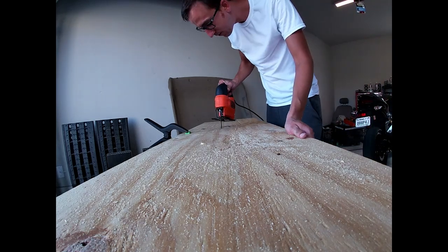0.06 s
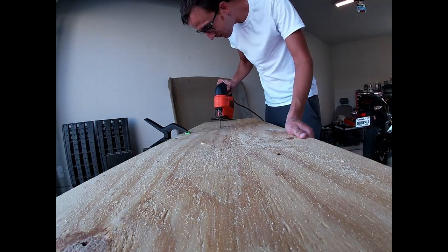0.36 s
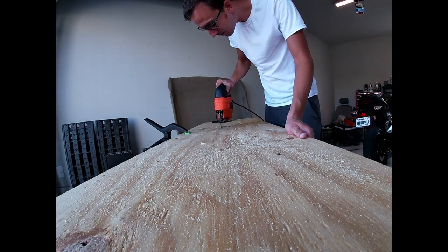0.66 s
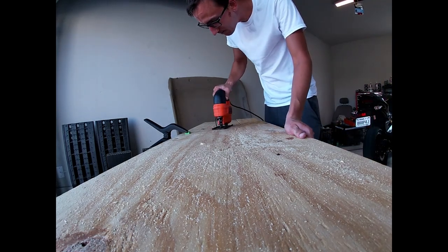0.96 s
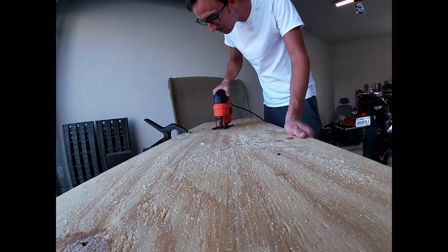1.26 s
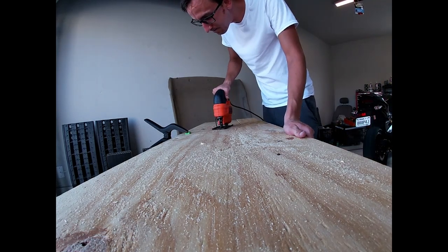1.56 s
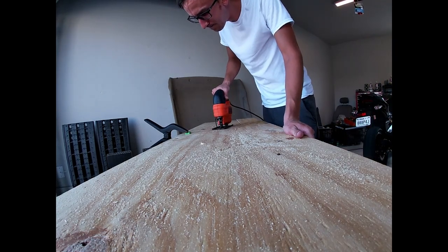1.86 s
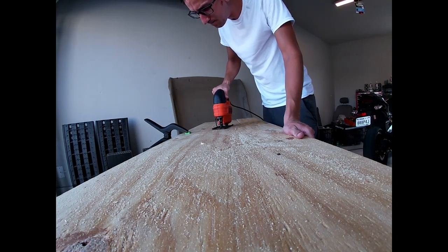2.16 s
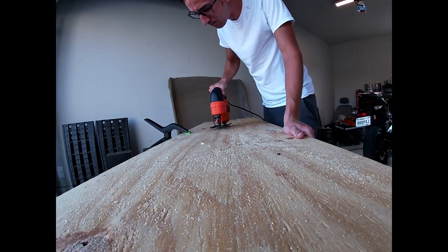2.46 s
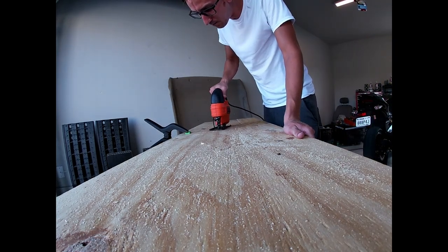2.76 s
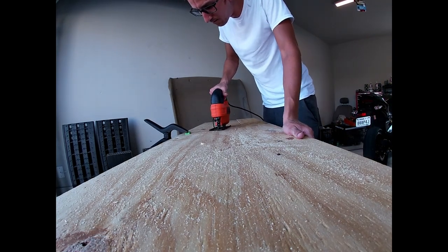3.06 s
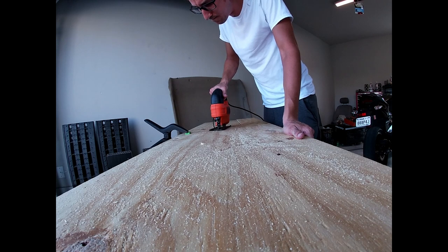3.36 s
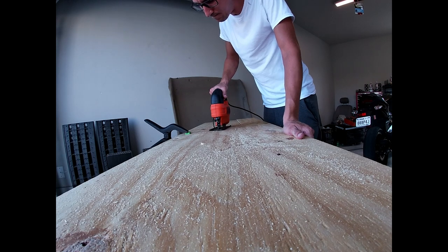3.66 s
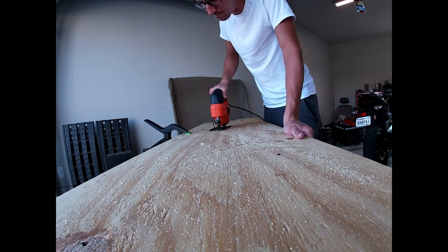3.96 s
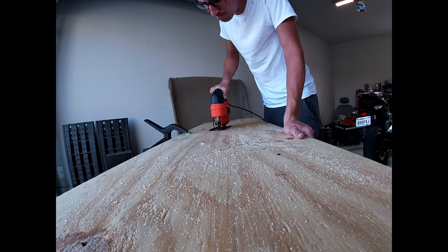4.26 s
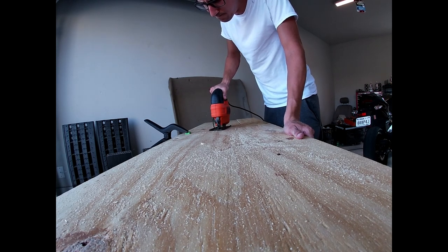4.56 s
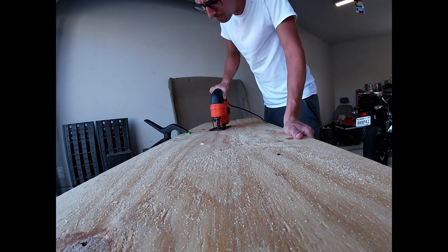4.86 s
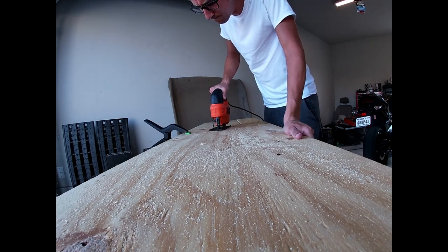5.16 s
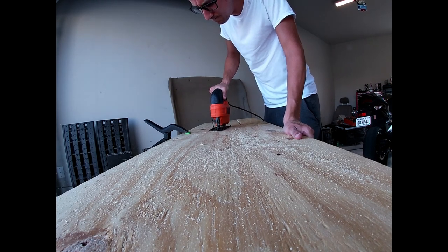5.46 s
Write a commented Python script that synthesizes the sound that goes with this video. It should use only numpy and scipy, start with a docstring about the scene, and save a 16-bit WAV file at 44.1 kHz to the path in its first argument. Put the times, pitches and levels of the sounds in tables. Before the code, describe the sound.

Over the rush and hum of a fan in a garage, a jigsaw is set on plywood and nudged into position, with two bouts of metal scrapes, knocks and low wooden creaks. Near the end it clicks on and kicks several times, then settles into buzzing, whining sawing that makes the whole sheet drone. The room adds a short echo.

```python
"""A corded jigsaw cuts a plywood sheet: the motor starts, the blade kicks a few times, then settles
at about 46 strokes a second. One crank shakes the sheet, drives the rasping blade and sets the
pitch of the gear whine. Before the cut, the steel shoe scrapes, judders and knocks on the board,
and the switch clicks on. Behind it are a humming fan and faint thin whistles in a bare garage.
A gain control ducks everything after each loud moment."""
import sys
import numpy as np
from scipy import signal
from scipy.fft import rfft, irfft
from scipy.io import wavfile
from scipy.ndimage import uniform_filter1d

SR = 44100
rng = np.random.default_rng(int(sys.argv[2]) if len(sys.argv) > 2 else 0)


def transcribe(u):
    """Save the signal u as a 16-bit wav file named by the first command-line argument.

    u: samples, shape (n,) or (channels, n), limited to [-1, 1]; the rate is SR.
    q: integer samples, one column per channel.
    """
    v = np.clip(np.atleast_2d(u).T, -1, 1)
    q = np.round(v * 32767).astype(np.int16)
    wavfile.write(sys.argv[1], SR, q)


N = 242550
T = np.arange(N) / SR
FFT_SIZE = 2 ** 18
HZ = np.fft.rfftfreq(FFT_SIZE, 1 / SR)
MOTOR_ON_S = 4.053


def amp(db):
    """Decibels to gain."""
    return 10 ** (np.asarray(db) / 20)


def unit(x):
    """Scales to rms 1."""
    return x / np.sqrt(np.mean(x ** 2) + 1e-20)


def curve(rows, column=1):
    """One column of a time table as an automation curve."""
    rows = np.array(rows, float)
    return np.interp(T, rows[:, 0], rows[:, column])


def swell(peak_s, rise_s, fall_s, roundness=1.35):
    """An envelope that rises to 1 and falls away."""
    return np.exp(-(abs(T - peak_s) / np.where(T < peak_s, rise_s, fall_s)) ** roundness)


def response(points, modes=(), hz=HZ):
    """A broad EQ curve with resonant peaks on top, in dB."""
    point_hz, db = np.transpose(points)
    broad = np.interp(np.log(hz + 1), np.log(point_hz + 1), db)
    return broad + sum(boost / (1 + (2 * (hz - centre) / width) ** 2) for centre, width, boost in modes)


def colour(x, db):
    """Minimum-phase EQ: resonances ring after what strikes them."""
    cepstrum = irfft(np.log(amp(np.maximum(db, -110))))
    cepstrum[1:FFT_SIZE // 2] *= 2
    cepstrum[FFT_SIZE // 2 + 1:] = 0
    return irfft(rfft(x, FFT_SIZE) * np.exp(rfft(cepstrum)))[:len(x)]


def noise():
    """White noise."""
    return rng.standard_normal(N)


def wander(rate_hz):
    """Smooth random modulation of rms 1."""
    return unit(irfft(rfft(noise(), FFT_SIZE) * np.exp(-(HZ / rate_hz) ** 2))[:N])


def add(mix, start_s, sound):
    """Lays a sound into the mix."""
    part = mix[round(start_s * SR):][:len(sound)]
    part += sound[:len(part)]


def garage(x, wet_db, t60_s=0.53):
    """Adds the bare room: sparse reflections whose treble dies first."""
    t = np.arange(SR // 2) / SR
    taps = rng.choice([-1., 1.], len(t)) * (rng.random(len(t)) < .08) * (t > .004)
    hz, age, spectrum = signal.stft(taps, SR, nperseg=256)
    decay = amp(-60 * age * (1 + hz[:, None] / 14000) / t60_s)
    tail = signal.istft(spectrum * decay, SR, nperseg=256)[1]
    return x + amp(wet_db) * signal.fftconvolve(x, tail / np.linalg.norm(tail))[:N]


# Rush of the fan: freq_hz, gain_db
AIR_EQ = [(40, -18.5), (90, -14), (160, -2.5), (240, -2.5), (350, -3.5), (500, -5), (750, -10.5),
          (1100, -16), (2000, -20.5), (3000, -21), (3900, -28.5), (5500, -34.5), (6300, -47), (8000, -58),
          (13000, -72.5)]
# Steadier tones of the hum: harmonic, level_db
HUM_TONES = [(1, -46), (3, -36), (4, -43), (5, -46)]
# Fader ride on those tones: time_s, gain_db
HUM_RIDE = [(0, -5.5), (1.4, 5.5), (2.35, -6), (2.6, -5), (3.05, -13), (3.9, 0.5)]
# Throbbing second harmonic: time_s, level_db
THROB_RIDE = [(0, -40), (.1, -31), (.33, -33.5), (.49, -23.5), (.56, -33), (.8, -29.5), (1.17, -36),
              (1.29, -22.5), (1.43, -39.5), (1.55, -29.5), (1.93, -40), (2.08, -26), (2.28, -37),
              (2.37, -27), (2.54, -49), (2.63, -31), (3.05, -45), (3.4, -47), (3.48, -32), (3.6, -39.5),
              (3.98, -27.5), (4.3, -39)]


def fan(pitch_hz=86.13, air_db=-31):
    """Rushing air and a wavering blade hum whose strongest tone swells and sinks."""
    air = unit(colour(noise(), response(AIR_EQ))) * amp(air_db + .5 * wander(9.0))
    turns = np.cumsum(pitch_hz * (1 + 0.0029 * wander(3.4))) / SR
    hum = sum(amp(db + 2.5 * wander(3.6)) * np.sin(2 * np.pi * (round(k) * turns + rng.random()))
              for k, db in HUM_TONES)
    throb_gain = amp(curve(THROB_RIDE) + 1.7 * wander(12))
    throb = throb_gain * np.sin(4 * np.pi * turns + 0.67 * wander(12))
    return air + np.sqrt(2) * (hum * amp(curve(HUM_RIDE)) + throb)


# Faint whistles: start_s, length_s, pitch_hz, level_db
WHISTLE_CUES = [(0.2, 0.06, 5600, -58), (0.4, 0.13, 5700, -57.5), (1.064, 0.12, 5620, -60),
                (1.58, .14, 5550, -65.5), (1.93, 0.26, 5700, -64), (2.857, 0.11, 7050, -72),
                (3.26, 0.36, 6370, -74)]


def whistles():
    """Thin high tones that swell and fade."""
    out = np.zeros(N)
    for start_s, length_s, hz, db in WHISTLE_CUES:
        n = int(length_s * SR)
        turns = np.cumsum(hz + 35 * wander(90)[:n]) / SR
        tone = np.sqrt(2) * np.sin(2 * np.pi * turns)
        add(out, start_s, amp(db) * tone * signal.windows.tukey(n, .6))
    return garage(out, wet_db=-0.5)


# Partials of the shoe: pitch_hz, level_db, t60_s
SHOE_MODES = [(2914, -7, 0.17), (3130, -12.5, 0.08), (2700, -15, 0.065), (4760, -16, 0.2)]


def shoe_ring(t):
    """The steel shoe rings after a tap."""
    attack = (1 - np.exp(-t / 0.0011)) ** 2
    return attack * sum(amp(db - 60 * t / t60) * np.sin(2 * np.pi * hz * t) for hz, db, t60 in SHOE_MODES)


# Scrape of steel on wood: freq_hz, gain_db
SCRAPE_EQ = [(300, -26.5), (700, -4), (1300, 8.5), (1850, 4.5), (2400, 5), (3500, -2.5), (5300, -11.5),
             (6300, -32), (8000, -55), (13000, -68)]
# Fine grit: freq_hz, gain_db
GRIT_EQ = [(3000, -27), (6000, 7), (8000, 0.5), (10000, -3.5), (11000, -18.5), (14000, -23)]
# Slides of the shoe: peak_s, rise_s, fall_s, scrape_db, ring_vs_scrape_db
SLIDE_CUES = [(.785, 0.08, 0.1, -36.5, -16), (0.935, 0.071, 0.12, -26, -15),
              (2.42, 0.069, 0.063, -30.5, -17), (2.745, 0.049, 0.091, -29, -19)]
# Crumbs under the shoe: peak_s, level_db
CRUNCH_CUES = [(.88, -61), (2.425, -52), (2.761, -56)]


def sliding(grain, grit_vs_scrape_db=-39.5, ring_lag_s=0.061):
    """The shoe grates over the grain and crushes crumbs; its ring builds up behind the scrape."""
    slide_env = sum(amp(db) * swell(s, rise, fall) for s, rise, fall, db, _ in SLIDE_CUES)
    ring_env = sum(amp(db + ring_db) * swell(s + ring_lag_s, rise, fall)
                   for s, rise, fall, db, ring_db in SLIDE_CUES)
    crunch_env = sum(amp(db) * swell(s, 0.0043, 0.028, roundness=1.1) for s, db in CRUNCH_CUES)
    scrape = unit(colour(grain, response(SCRAPE_EQ)))
    grit = unit(colour(grain, response(GRIT_EQ)))
    ring = unit(signal.fftconvolve(grain, shoe_ring(T[:SR // 2]))[:N])
    return slide_env * (scrape + amp(grit_vs_scrape_db) * grit) + ring_env * ring + crunch_env * grit


# Body of the plywood, also under the knocks and the cut: freq_hz, gain_db
SHEET_EQ = [(30, -27.5), (110, -34.5), (150, -4.5), (300, -10), (480, -5), (650, -7.5), (900, -12.5),
            (1200, -32), (2500, -44), (8000, -88.5)]
# Groan of the sheet: pitch_hz, width_hz, relative_db
GROAN_MODES = [(169.6, 12.8, 6), (233.7, 44, 5.5)]
# Rumble of the table: freq_hz, gain_db
RUMBLE_EQ = [(12, -9.5), (35, 5.5), (60, 5), (100, -1), (140, 2), (220, -25), (600, -73)]
# Swells from leaning on the tool, the switch-on thump, then the running saw shaking the table:
# peak_s, fade_s, groan_db, rub_db, rock_db
SWELL_CUES = [(0.19, 0.13, -29.5, -35, -25.5), (.46, 0.063, -27.5, -48, -55),
              (0.968, 0.11, -18.5, -20, -18), (1.75, 0.092, -35, -36, -31), (2.1, 0.07, -40, -26.5, -39),
              (2.215, 0.013, -41, -54, -28.5), (2.4, 0.044, -26.5, -31, -29.5),
              (2.79, 0.086, -24.5, -30, -21), (3.02, 0.027, -58, -45, -30.5), (3.19, 0.1, -51, -35.5, -42),
              (3.461, 0.063, -51, -37, -32.5), (4.05, 0.039, -22.5, -27.5, -30),
              (5.4, .25, -36, -38.5, -35)]


def groan_and_rumble(grain, resting_db=-41.5, rock_lag_s=0.031):
    """In each swell the sheet groans, the shoe rubs on it and the table rocks a little later."""
    groan = np.zeros(N)
    for hz, width_hz, db in GROAN_MODES:
        gain = amp(db + 2 * wander(width_hz))
        pitch = hz + width_hz * wander(26.2) / 2
        groan += gain * np.sin(2 * np.pi * np.cumsum(pitch) / SR)
    groan = unit(groan)
    rub = unit(colour(grain, response(SHEET_EQ, modes=[(225, 140, 3.8), (368, 95, 7.9)])))
    rumble = unit(colour(noise(), response(RUMBLE_EQ)))
    out = amp(resting_db) * (groan + rumble)  # the resting weight of the hand
    for peak_s, fade_s, groan_db, rub_db, rock_db in SWELL_CUES:
        out += swell(peak_s, fade_s, fade_s) * (amp(groan_db) * groan + amp(rub_db) * rub)
        out += swell(peak_s + rock_lag_s, fade_s, 1.2 * fade_s) * amp(rock_db) * rumble
    return out


# Squeaks and low creaks of the shoe: peak_s, fade_s, pitch_hz, level_db
JUDDER_CUES = [(0.782, 0.031, 2190, -37), (.957, 0.012, 2880, -27.5), (1.012, 0.024, 2870, -28.5),
               (2.102, 0.067, 302.5, -23), (2.441, .05, 194, -25)]


def judder(sag_per_s=.15, waver=0.012):
    """The shoe sticks and slips in short, unsteady, falling tones."""
    out = np.zeros(N)
    for peak_s, fade_s, hz, db in JUDDER_CUES:
        pitch = hz * (1 - sag_per_s * (T - peak_s) + waver * wander(50))
        tone = np.sqrt(2) * np.sin(2 * np.pi * np.cumsum(pitch) / SR)
        out += tone * amp(db) * swell(peak_s, fade_s, fade_s)
    return out


# Body of the blade, plunger and shoe: freq_hz, gain_db
STEEL_EQ = [(100, -11), (700, -4.5), (1200, -3), (1550, -1.5), (2150, 0.5), (2500, -7.5), (3200, -4.5),
            (3700, -8.5), (5200, -10), (6200, -25), (7500, -31.5), (9700, -42), (10800, -48), (13000, -52)]
# Resonances of the plywood: centre_hz, width_hz, boost_db
SHEET_PEAKS = [(170.4, 24, 6.6), (227.4, 18, 10.2), (301.6, 14.6, 13.1), (317.6, 13, 8.2),
               (370.5, 4.6, 20.7), (397.4, 15, 10), (414, 17, 8.7), (481.6, 22, 7.2), (501.7, 18, 12.2),
               (564, 18, 9.8), (608, 4.2, 5.5), (785, 8.9, 11.3)]
# Knocks of the shoe on the sheet, then the bright click of switching on:
# start_s, clack_db, thud_db, tilt_db_per_octave, clack_centre_hz
KNOCK_CUES = [(.169, -33.5, -30, 2, 2160), (.186, -45, -24.5, -11, 1200), (.9268, -10, -24, -10.5, 2910),
              (.9285, -11, -18, -10, 1640), (.952, -16, -15.5, -10, 1490), (.9737, -20, -26, -9, 1600),
              (2.323, -37, -40, 8, 3470), (2.389, -28, -29, 8, 1850), (2.4206, -24.5, -28, 8.5, 2270),
              (2.467, -36, -33, 9, 2000), (2.707, -32.5, -27, 8, 3300), (2.7243, -14, -33, -7.5, 1920),
              (2.7255, -25, -34, -1, 3020), (2.7595, -25.5, -25.5, 1, 2400), (2.7656, -20, -26, -8, 1500),
              (2.7704, -31, -31.5, -1, 2200), (4.044, -28, -35, 8, 3500)]


def knocks(cues, clack_s=0.0036, thud_s=0.0087, ring_db=-10, rise_s=0.00042, focus_db=12):
    """Each knock is a short chatter of steel and a softer thud in the sheet."""
    t, out = np.arange(2 ** 15) / SR, np.zeros(N)
    hz, click = np.fft.rfftfreq(len(t), 1 / SR), signal.unit_impulse(len(t))
    steel = rfft(colour(click, response(STEEL_EQ, modes=[(1810, 160, 5.7), (2780, 620, 15.2)])))
    wood = rfft(colour(click, response(SHEET_EQ, SHEET_PEAKS) - 11.4 * np.log2(HZ / 300 + 1)))
    contact = (1 - np.exp(-(t / rise_s) ** 2)) * (1 - t / t[-1])  # wood gives a little under the blow
    octaves = np.log2(np.minimum(hz, 7000) / 2000 + .5)
    for start_s, clack_db, thud_db, tilt, centre_hz in cues:
        chatter, push = rng.standard_normal((2, len(t)))
        focus = focus_db / (1 + ((hz - centre_hz) / 230) ** 2)
        clack = irfft(rfft(chatter * np.exp(-t / clack_s)) * steel * amp(tilt * octaves + focus))
        clack /= np.std(clack[:SR // 200])
        thud = irfft(rfft(push * np.exp(-t / thud_s)) * wood)
        thud /= np.std(thud[:SR // 50])
        # a clack near the shoe's own pitch sets it ringing most
        ring = amp(ring_db + np.interp(SHOE_MODES[0][0], hz, focus) - focus_db) * shoe_ring(t)
        add(out, start_s, contact * (amp(clack_db) * (clack + ring) + amp(thud_db) * thud))
    return garage(out, wet_db=-10.5)


# Lowest modes of the sheet: pitch_hz, level_db
HEAVE_TONES = [(41, -25), (76, -19), (168, -13)]
# The blade catches: start_s, clack_db, thud_db, tilt_db_per_octave, clack_centre_hz
KICK_CUES = [(4.0515, -16, -22, -9.5, 1870), (4.056, -18, -26.5, 3.5, 4400), (4.068, -14, -18, -12.5, 2900),
             (4.089, -13, -13, -7, 2010), (4.1052, -1.5, -21, -9, 1830), (4.1266, -5.5, -10.5, -10.5, 1950),
             (4.1539, -8, -8, -5, 1920), (4.1655, -7, -11, -4, 2060), (4.185, -4.5, -13, -11, 1690),
             (4.2, -12, -16, -19, 1680), (4.2191, -5.5, -8.5, -8, 1680), (4.2497, -7, -11.5, -10, 1680),
             (4.2887, -9, -12.5, 1, 1690), (4.3068, -21, -21, -7, 1640)]


def kicks():
    """The catching blade clacks, and the first strokes heave the whole sheet."""
    sway = sum(amp(db) * np.sin(2 * np.pi * (hz * T + rng.random())) for hz, db in HEAVE_TONES)
    heave = np.sqrt(2) * sway * swell(peak_s=4.086, rise_s=0.036, fall_s=0.0091)
    return heave + knocks(KICK_CUES, clack_s=0.0094, ring_db=-15.0, rise_s=0.00092, focus_db=8.5)


def harmonics(stroke_hz, turns, body, modes, last, flutter_db, first=1):
    """Harmonics of the stroke rate, each loud as it crosses a mode of the body; levelled to rms 1."""
    on, out, waver = T > MOTOR_ON_S, np.zeros(N), wander(25)
    t, coarse_hz = T[on], stroke_hz[on][::64]
    for k in range(first, last + 1):
        gain = np.interp(t, t[::64], amp(response(body, modes, k * coarse_hz)))
        flutter = amp(flutter_db * np.roll(waver, rng.integers(N))[on])
        out[on] += gain * flutter * np.cos(2 * np.pi * (k * turns[on] + rng.random()))
    return out / np.sqrt(abs(uniform_filter1d(out ** 2, size=4000)) + 1e-9)


# Body of the gear housing: freq_hz, gain_db
GEAR_EQ = [(1200, -28), (1520, -22.5), (1620, -12), (1720, -10.5), (1765, -31), (1860, -8.5), (1950, -17),
           (2150, -30)]
# Its peak and notch: centre_hz, width_hz, gain_db
GEAR_MODES = [(1680, 37, 9), (1950, 34, -10.5)]


def gear_whine(stroke_hz, turns):
    """The gears mesh cleanly: a few high harmonics sing steadily in the housing."""
    return harmonics(stroke_hz, turns, GEAR_EQ, GEAR_MODES, first=30, last=58, flutter_db=1.5)


# Flap, boom and growl bands of the sheet: centre_hz, half_width_hz
SHEET_BANDS = [(130, 100), (370, 30), (505, 50)]
# EQ ride on those bands: time_s, flap_db, boom_db, growl_db
FLEX_RIDE = [(4.05, 3, -5, -3), (4.15, -3, 5.5, -7.5), (4.27, -3, 5, 4), (4.33, -12, 5, -0.5),
             (4.43, -2, -0.5, 1.5), (4.52, -0.5, -1, -0.5), (4.7, 1, -3.5, 3.5), (4.88, 1.5, 0, -1.5),
             (5.02, 5, 4.5, 1.5), (5.18, 3, -2, 0), (5.28, -0.5, -5.5, 4), (5.4, -1, -7.5, 1),
             (5.5, 2, 0, -2)]


def flexing(x):
    """The sheet flexes differently as the shoe travels: three bands swell and sink."""
    spectrum, out = rfft(x, FFT_SIZE), x
    for column, (centre, width) in enumerate(SHEET_BANDS, start=1):
        band = irfft(spectrum * np.exp(-((HZ - centre) / width) ** 4))[:N]
        out = out + band * (amp(curve(FLEX_RIDE, column)) - 1)
    return out


def shaking(stroke_hz, turns, evenness, slip_turns=0.0044, sway_db=1.5):
    """The crank drives the sheet in step with the strokes; uneven strokes make it drum."""
    slipping = turns + slip_turns * wander(33)  # no stroke comes quite on time
    drone = harmonics(stroke_hz, slipping, SHEET_EQ, SHEET_PEAKS, last=28, flutter_db=1.0)
    drone *= amp(sway_db * wander(35))  # or is as strong as the last
    buffets = noise() * (1 + 0.76 * np.cos(4 * np.pi * turns))
    drumming = unit(colour(buffets, response(SHEET_EQ, SHEET_PEAKS)))
    return flexing(np.sqrt(evenness) * drone + np.sqrt(1 - evenness) * drumming)


# Resonances of the blade, plunger and shoe: centre_hz, width_hz, boost_db
STEEL_PEAKS = [(1560, 70, 1.6), (1655, 44, 9.3), (1900, 33, 5.1), (2400, 170, 2.4), (2840, 82, 5.8)]


def blade(stroke_hz, turns, evenness, play_turns=0.0029):
    """The plunger buzzes through the steel; the teeth tear the plies on both halves of the stroke."""
    loose = turns + play_turns * wander(63)  # play in the guide smears the highest harmonics
    buzz = harmonics(stroke_hz, loose, STEEL_EQ, STEEL_PEAKS, last=72, flutter_db=7.0)
    bite = .9 + np.exp(-(2 * turns % 1) / .25)
    fibres = noise() * bite * amp(0.9 * wander(360) + 1.1 * wander(30))
    bright_steel = response(STEEL_EQ, STEEL_PEAKS) + 2.0 * np.log2(HZ / 2000 + .5)
    rasp = unit(garage(colour(fibres, bright_steel), wet_db=-9.0))
    buzz_share = amp(-6) * evenness
    return np.sqrt(buzz_share) * buzz + np.sqrt(1 - buzz_share) * rasp


# The crank runs up under load: time_s, stroke_hz
RUN_UP = [(4.05, 19.7), (4.15, 30.3), (4.25, 35.5), (4.33, 37.3), (4.4, 40.3), (4.484, 41.8), (4.634, 44),
          (4.732, 44.1), (4.798, 44.8), (4.886, 45.7), (5.0, 46.1), (5.2, 46.35), (5.3, 46.4), (5.5, 46.55)]
# How much of the motion repeats from stroke to stroke: time_s, share_0_to_1
EVENNESS = [(4.05, 0.37), (4.35, 0.41), (4.65, 0.53), (5.1, 0.52), (5.5, 0.7)]
# Mix of the cut: time_s, sheet_db, blade_db, gears_db
CUT_MIX = [(4.05, -15.5, -17, -30), (4.2, -6.5, -10, -13), (4.3, -4.5, -9.5, -18.5), (4.37, -6, -8.5, -25),
           (4.75, -5.5, -10, -22.5), (4.97, -7.5, -10.5, -19.5), (5.1, -6, -10, -19),
           (5.25, -4.5, -10, -16), (5.5, -9.5, -13, -15.5)]


def jigsaw(fade_in_s=0.03):
    """One crank moves the sheet, the blade and the gears as the motor closes in on top speed."""
    stroke_hz = (T >= MOTOR_ON_S) * curve(RUN_UP) * (1 + 0.0013 * wander(25.4))
    turns, evenness = np.cumsum(stroke_hz) / SR, curve(EVENNESS)
    running = np.clip((T - MOTOR_ON_S) / fade_in_s, 0, 1)
    sheet = shaking(stroke_hz, turns, evenness) * amp(curve(CUT_MIX, column=1))
    steel = blade(stroke_hz, turns, evenness) * amp(curve(CUT_MIX, column=2))
    gears = gear_whine(stroke_hz, turns) * amp(curve(CUT_MIX, column=3))
    return running * (sheet + steel + gears)


def scene():
    """Mono mix: the saw is set in place and then cuts, over the garage ambience."""
    grain = noise() * amp(1.6 * wander(390))  # roughness of the wood under the shoe
    foley = sliding(grain) + groan_and_rumble(grain) + judder() + knocks(KNOCK_CUES)
    sawing = jigsaw() + kicks()
    return (fan() + whistles() + foley + sawing)[None]


def record(dry, threshold_db=-21, squeeze=0.57, sense_s=0.013, release_db_per_s=14.0, cutoff_hz=14000):
    """Gain control ducks loud moments and recovers slowly; a low-pass trims the top."""
    pole = np.exp(-1 / (sense_s * SR))
    power_db = 10 * np.log10(signal.lfilter([1 - pole], [1, -pole], dry[0] ** 2) + 1e-12)
    release = release_db_per_s * T
    held_db = np.maximum.accumulate(power_db + release) - release
    ducked = dry * amp(-squeeze * np.maximum(held_db - threshold_db, 0))
    lowpass = signal.firwin(255, cutoff_hz, window=("kaiser", 8), fs=SR)
    return signal.oaconvolve(ducked, lowpass[None], "same")


dry = scene()
out = record(dry)
transcribe(out)
```